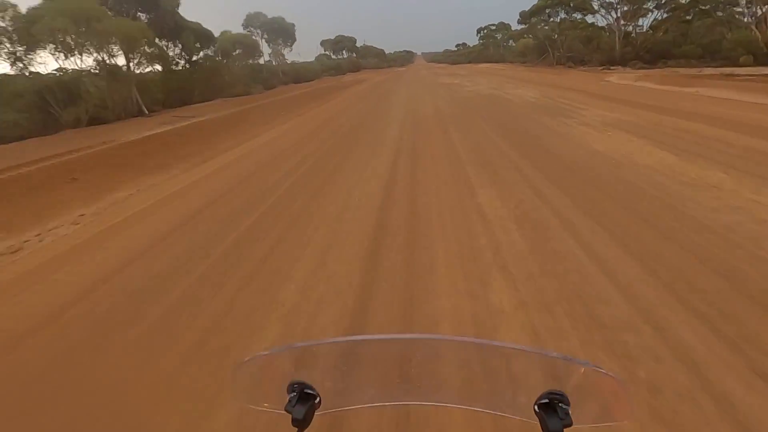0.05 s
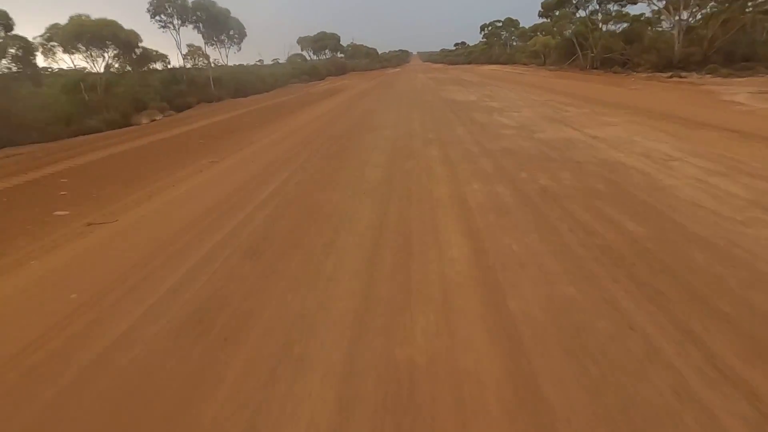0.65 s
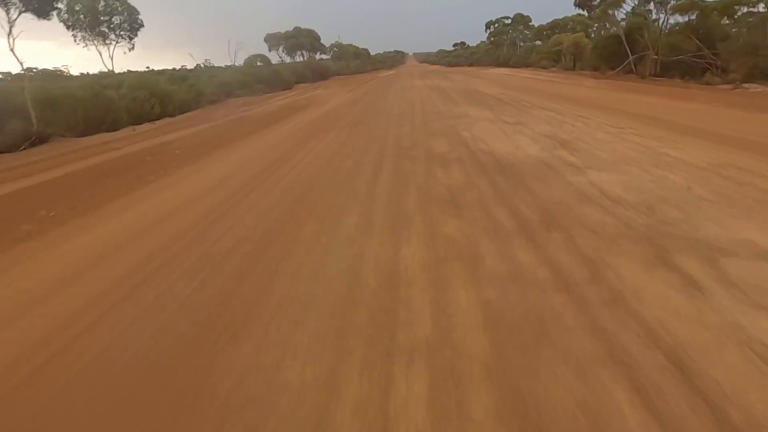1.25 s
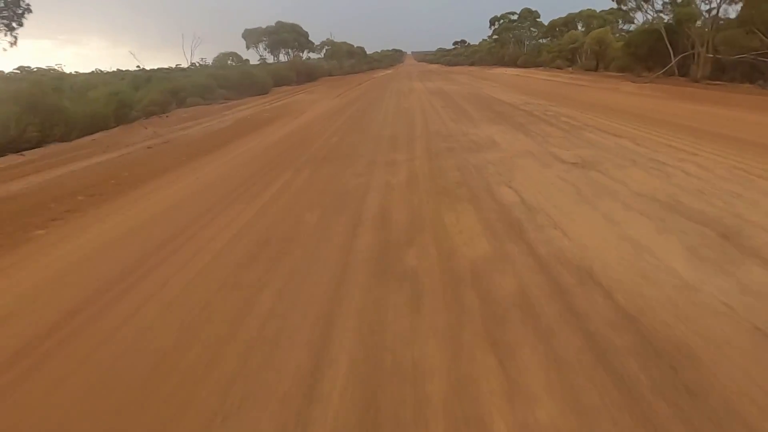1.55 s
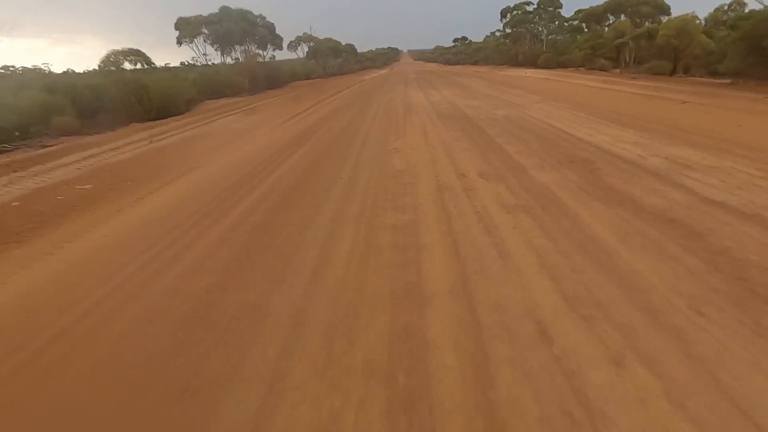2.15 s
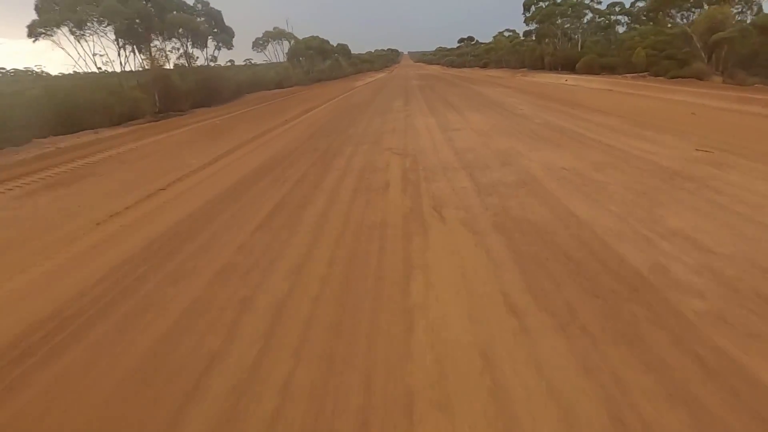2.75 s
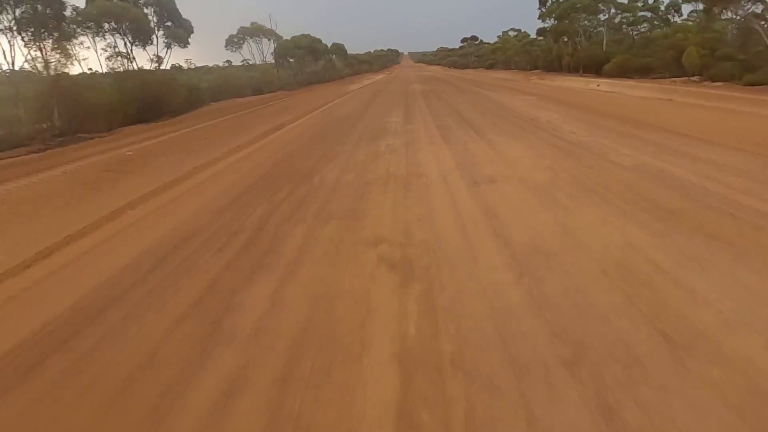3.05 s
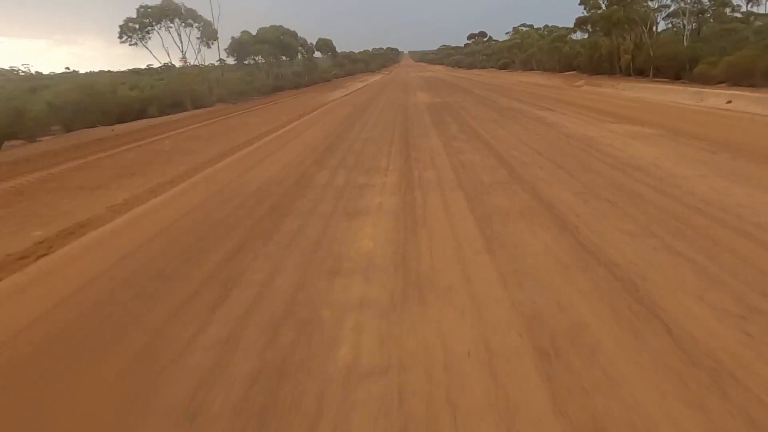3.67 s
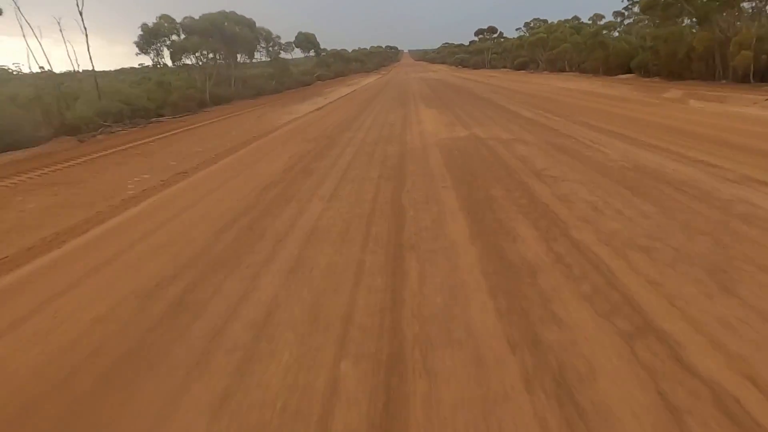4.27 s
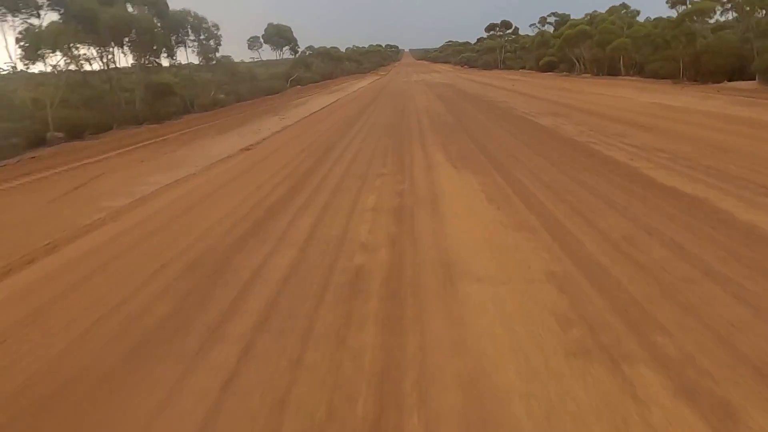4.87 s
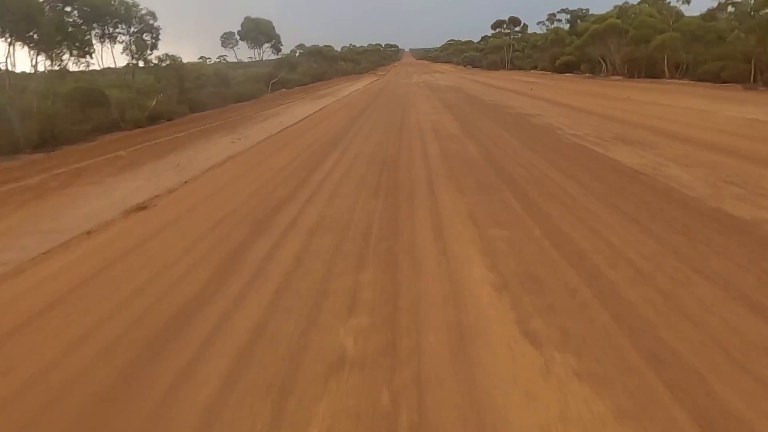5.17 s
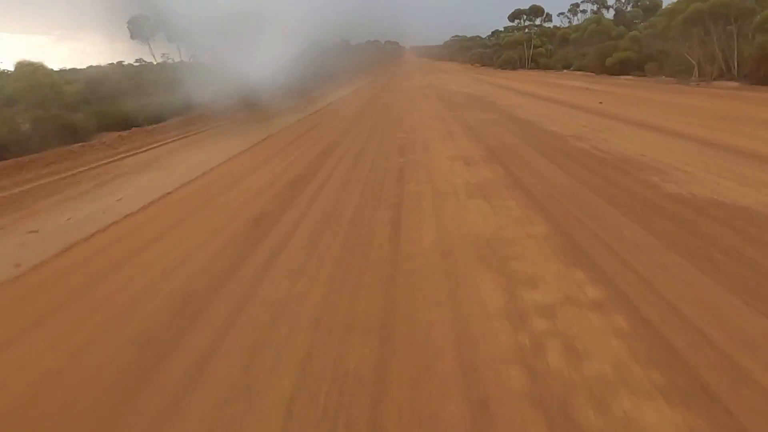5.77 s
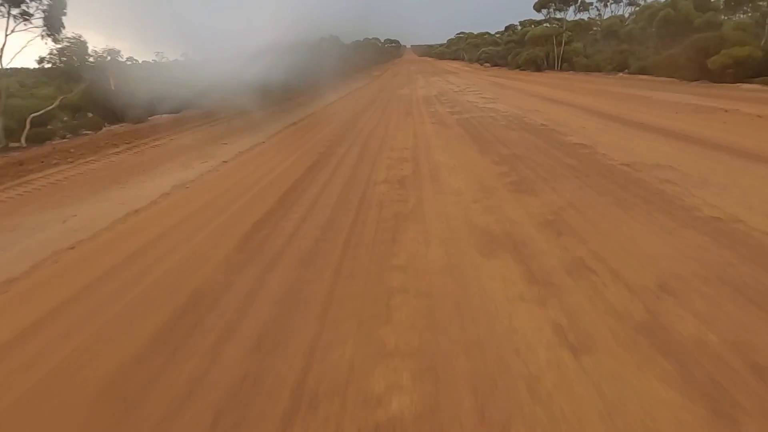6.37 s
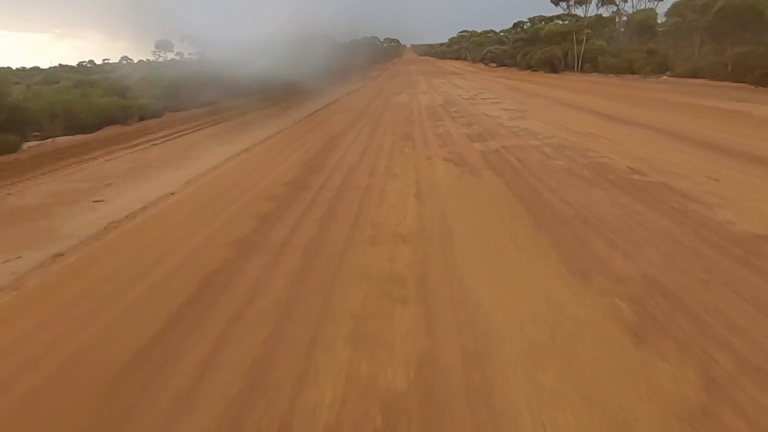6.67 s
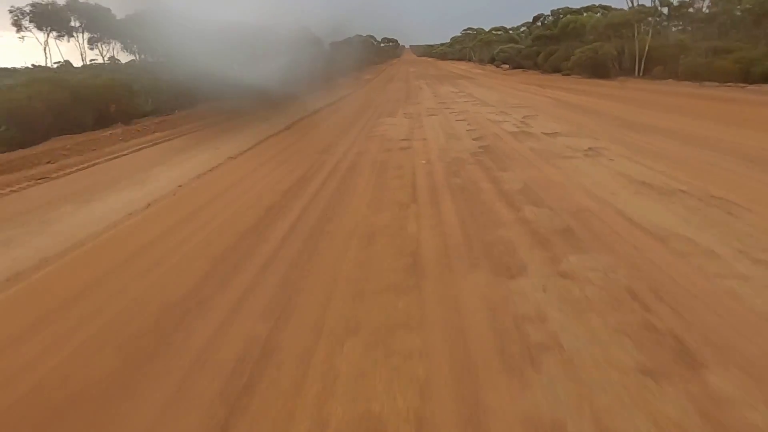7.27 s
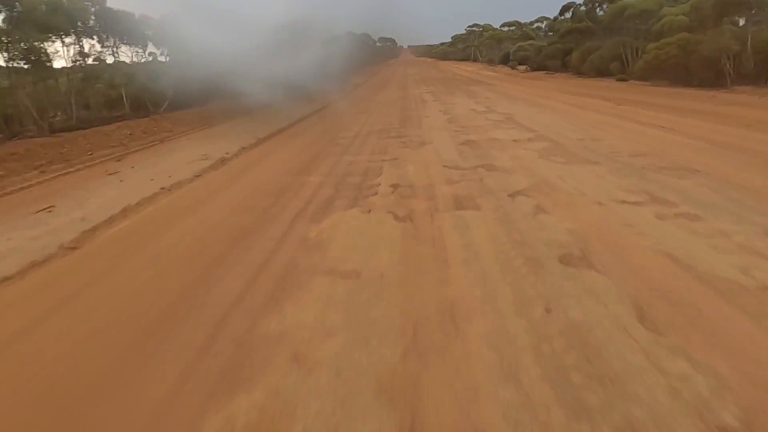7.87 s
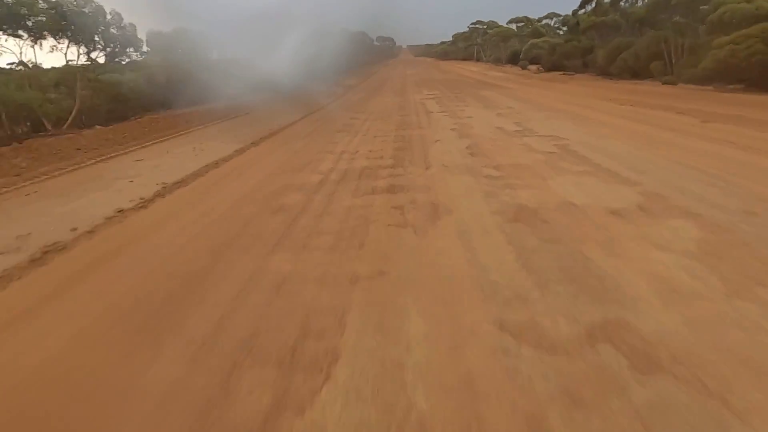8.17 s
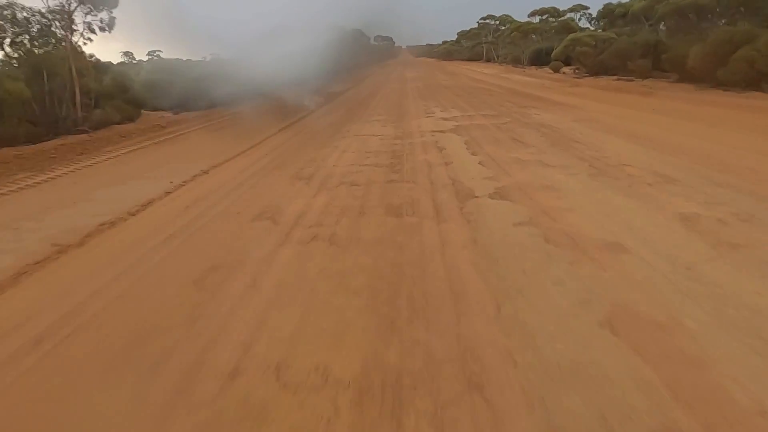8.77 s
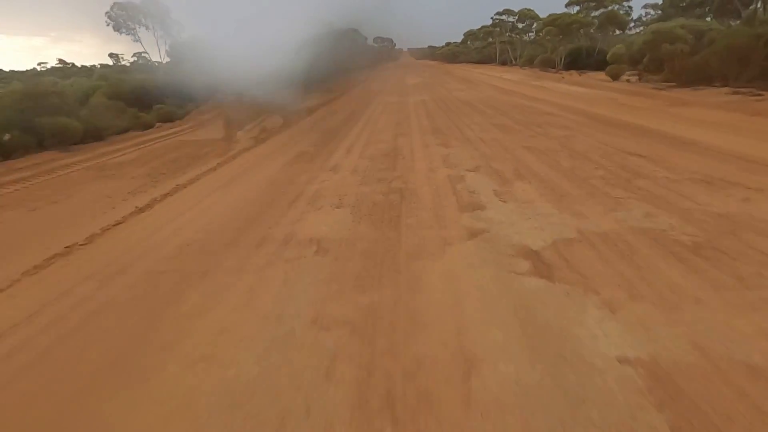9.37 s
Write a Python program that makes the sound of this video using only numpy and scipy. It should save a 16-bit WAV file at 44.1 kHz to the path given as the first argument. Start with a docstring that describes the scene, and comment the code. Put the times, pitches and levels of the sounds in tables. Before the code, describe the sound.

A single-cylinder motorcycle cruises along a gravel road, heard from a microphone on the rider, in the left channel only. The exhaust thumps in a fast, even drone with light metallic clatter, while gusts of wind rumble and rush over the microphone. Tyres hiss faintly and flung stones tick against the bike, two of them sharper than the rest. The engine eases slightly midway and picks up again near the end.

```python
"""A single-cylinder motorcycle cruises on gravel, heard from a microphone on the rider, left channel only.
From the start the exhaust thumps about 44 times a second, each thump led by an intake bark, over valve
clatter, tyre hiss and gusts of wind. By 0.7 s the microphone leaves the windscreen's shelter and the air
hisses more. Flung stones tick on the bike, hardest at 1.4 and 5.6 s. The engine eases a little through
the middle and picks up again from about 8 s."""
import sys
import numpy as np
from scipy import signal
from scipy.fft import rfft, irfft
from scipy.io import wavfile

SR = 44100
rng = np.random.default_rng(int(sys.argv[2]) if len(sys.argv) > 2 else 0)


def wrap_up_sound(samples):
    """Save the sound to the file named by the first command line argument, as 16-bit audio."""
    columns = np.atleast_2d(samples).T
    # keep every value between -1 and 1, then stretch to whole-number steps
    tamed = np.clip(columns, -1, 1)
    steps = np.round(tamed * 32767).astype(np.int16)
    wavfile.write(sys.argv[1], SR, steps)


N = 419832
TIME = np.arange(N) / SR


def gain_of(db):
    """Decibels to amplitude."""
    return 10 ** (np.asarray(db) / 20)


def unit_rms(x):
    """Scales to an rms of 1."""
    return x / np.sqrt(np.mean(x ** 2) + 1e-20)


def curves(rows):
    """Turns rows of (time, values...) into one automation curve per value column."""
    times, *columns = np.transpose(rows)
    return [np.interp(TIME, times, column) for column in columns]


def wander(hz):
    """Random drift of rms 1 that rolls off above hz."""
    f = np.fft.rfftfreq(N, 1 / SR)
    return unit_rms(irfft(rfft(rng.standard_normal(N)) / (1 + (f / hz) ** 4), N))


def colour(x, points):
    """Shapes x with an EQ curve drawn on a log-frequency axis; rms 1."""
    hz, db = np.transpose(points)
    f = np.fft.rfftfreq(N, 1 / SR)
    eq_db = np.interp(np.log(f + 1), np.log(hz), db)
    return unit_rms(irfft(rfft(x) * gain_of(eq_db), N))


def ring(x, modes, size=16384):
    """Passes x through a body with steep resonances that ring only after they are struck; rms 1."""
    f = abs(np.fft.fftfreq(size, 1 / SR))
    power = sum((gain_of(db) / (1 + (2 * (f - hz) / width) ** 2)) ** 2 for hz, width, db in modes)
    log_gain = np.log(power + 1e-12) / 2
    minimum_phase = np.exp(np.conj(signal.hilbert(log_gain)))
    response = np.fft.ifft(minimum_phase).real[:size // 2]
    return unit_rms(signal.oaconvolve(x, response)[:N])


def strokes(cycle, at, uneven_db):
    """One impulse each engine cycle, at the fraction `at` of the cycle; no two equally strong."""
    hits = np.diff(np.floor(cycle - at), prepend=np.floor(cycle[0] - at))
    return unit_rms(hits * gain_of(uneven_db * rng.standard_normal(N)))


def puffs(cycle, at, length):
    """A burst of turbulence each engine cycle, decaying over the fraction `length` of the cycle."""
    return unit_rms(np.exp(-((cycle - at) % 1) / length) * rng.standard_normal(N))


def gravel(grains_per_s=1300, grit_per_s=26):
    """Countless grains crunch under the tyres over a smooth hiss; grit pings off the mudguard."""
    # tyre hiss on the road (time [s], level [dB])
    road_levels = [(0, -54.5), (.4, -52), (.75, -48.5), (1.4, -47), (3.0, -49), (4.0, -49.5), (4.2, -47),
                   (5.15, -47.5), (5.4, -46), (5.9, -48), (8.1, -47), (8.65, -48.5), (9.52, -46)]
    # tone of the crunch (frequency [Hz], level [dB])
    crunch_eq = [(500, -4.5), (1500, -3.5), (3000, 0), (4000, 0), (5200, -7.5), (6800, -5), (7600, -8),
                 (8500, -14), (9600, -16.5), (11000, -28), (12300, -35), (15000, -41)]
    # ring of grit on the mudguard (frequency [Hz], width [Hz], level [dB])
    grit_modes = [(7000, 1500, -1), (8900, 1300, 0), (10300, 1600, -9)]
    level_db, = curves(road_levels)
    grain_strength = gain_of(4.3 * np.minimum(rng.exponential(1, N), 5))
    grains = grain_strength * rng.choice([-1, 1], N) * (rng.random(N) < grains_per_s / SR)
    crunch = colour(rng.standard_normal(N) + gain_of(-6) * unit_rms(grains), crunch_eq)
    speck_strength = gain_of(3 * np.minimum(rng.exponential(1, N), 3))
    specks = speck_strength * (rng.random(N) < grit_per_s / SR)
    grit = gain_of(level_db - 26) * ring(specks, grit_modes)
    patchy_db = 0.5 * wander(hz=4.6) + wander(hz=45)
    return gain_of(level_db + patchy_db) * crunch + grit


def stones(overtone=1.35, top_hz=10300, attack_s=.0004, t60_s=.01, size=4096):
    """Each flung stone makes a dry tick: a broad crack and two short tones, duller for bigger stones."""
    # stones hitting the bike (time [s], peak [dB], pitch [Hz], share of ring against crack [0-1])
    hits = [(.128, -32, 2200, .3), (.2322, -33, 3600, .3), (.2325, -39, 7500, .1), (.3997, -39, 7400, .3),
            (.5262, -42, 5000, .3), (.6056, -38, 6700, .2), (.6217, -35, 8400, .4),
            (.7098, -26.5, 1800, .5), (.7278, -32, 5100, .6), (.7896, -31, 6900, .4), (.862, -37, 8900, .4),
            (1.1727, -42, 9100, .7), (1.2638, -38, 5500, .5), (1.2948, -39, 7750, .5),
            (1.327, -35, 6700, .4), (1.4195, -20, 1550, .65), (1.651, -42.5, 9500, .6),
            (1.8761, -43, 9100, .5), (2.0202, -34, 6400, .3), (2.0225, -31, 3000, .2),
            (2.025, -35, 7500, .1), (2.177, -38, 8950, .5), (2.4985, -37, 8600, .8),
            (2.9666, -40, 7600, .3), (3.2065, -38, 6700, .4), (3.823, -43, 8200, .4),
            (4.202, -43, 8000, .2), (4.4568, -39, 7100, .4), (4.708, -37, 6900, .5),
            (5.0645, -31, 6720, .75), (5.1363, -41, 7600, .3), (5.1517, -39, 7750, .3),
            (5.6385, -21, 1600, .45), (5.726, -42, 8500, .3), (6.02, -43, 9000, .5), (6.924, -33, 6700, .3),
            (7.2715, -37, 6200, .5), (7.428, -38, 6200, .6), (8.08, -40, 7900, .4), (8.357, -36, 7200, .3),
            (8.391, -39, 7900, .4)]
    out = np.zeros(N + size)
    t, f = np.arange(size) / SR, np.fft.rfftfreq(size, 1 / SR)
    envelope = gain_of(-60 * t / t60_s) * (1 - np.exp(-t / attack_s))
    for time, peak_db, hz, ringing in hits:
        band = np.exp(-(np.log2((f + 1) / hz) / .65) ** 2)
        low_shelf = gain_of(-16) / (1 + (f / (2 * hz)) ** 4)
        crack_eq = (band + low_shelf) / (1 + (f / top_hz) ** 7)
        crack = unit_rms(irfft(rfft(rng.standard_normal(size)) * crack_eq))
        tones = sum(np.sin(2 * np.pi * m * t) / (1 + (m / top_hz) ** 30) for m in (hz, overtone * hz))
        tick = (ringing * unit_rms(tones) + (1 - ringing) * crack) * envelope
        start = round(time * SR)
        out[start:start + size] += gain_of(peak_db) * tick / abs(tick).max()
    return out[:N]


def airflow(eddy_db=2, flutter_db=0.69):
    """Buffet, drum and rush levels in dB: steady flow, smooth gusts and lulls, and small random eddies."""
    # the steady wind bed (time [s], buffet [dB], drum [dB], rush [dB])
    steady_flow = [(0, -20.5, -27, -26.5), (1.1, -21.5, -32.5, -26.5), (2.4, -21, -33.5, -28.5),
                   (3.3, -22, -27, -25.5), (4.1, -22, -33.5, -28.5), (5.4, -21.5, -32.5, -27.5),
                   (7.4, -20.5, -32, -25.5), (8.6, -23.5, -42, -25), (9.52, -20.5, -26, -24)]
    # gusts, or lulls where negative
    # (centre [s], length [s], added buffet [dB], added drum [dB], added rush [dB])
    gusts = [(.26, 0.37, 2.5, 4, 0.5), (0.745, 0.11, 3.5, 5, 1.5), (0.885, 0.13, -3, 4, -2.5),
             (1.167, 0.33, 3.5, 8, -2), (1.472, 0.18, 4, 3.5, 2.5), (1.734, 0.053, 1, -3, -6),
             (1.875, 0.28, -2.5, 9, 2), (2.184, 0.19, 1, 6.5, 4.5), (2.385, 0.17, 3, 2, 5.5),
             (2.653, 0.064, 0.5, 10.5, 2), (2.86, 0.1, 0, 4.5, 4.5), (2.98, 0.15, 2, 7.5, 4.5),
             (3.19, 0.086, 3, 3.5, 3), (3.292, 0.13, 6.5, 2, -0.5), (3.582, 0.1, 2, 5, 3.5),
             (3.683, 0.21, 1, -17, -1.5), (4.193, 0.13, 6, 9, 2.5), (4.722, 0.14, 5, 2, 2),
             (4.841, 0.056, 7, 7, 5.5), (5.393, 0.28, 4, 1, 1.5), (5.64, 0.11, 7, -3, 3),
             (5.811, 0.12, 2, 6, 5.5), (6.13, 0.19, -7, -9, 2), (6.44, 0.2, 3, 1, 3),
             (6.667, 0.16, 0, -7, 0), (6.997, 0.17, 4.5, 5, -0.5), (7.223, 0.11, -2, 9, 0),
             (7.67, 0.13, 1.5, 2, 2), (7.81, 0.15, 4, -5, 1), (8.172, 0.17, 2, 7, 3.1),
             (8.335, 0.12, 6, 9, 1.5), (8.53, 0.36, -1, -4, -1.5), (8.913, .1, 0, -2, 0.5),
             (9.088, 0.12, -7, 11.5, 3)]
    levels = np.array(curves(steady_flow))
    for centre, length, *added_db in gusts:
        swell = np.cos(np.pi / 2 * np.clip(2 * (TIME - centre) / length, -1, 1))
        levels += np.outer(added_db, swell)
    buffet_db, drum_db, rush_db = levels
    flutter = flutter_db * wander(hz=17)
    return buffet_db + eddy_db * wander(hz=8.9), drum_db + flutter, rush_db + flutter


def wind(cycle):
    """Large eddies shake the microphone, smaller ones drum on it; rush and hiss throb with each firing."""
    # the hiss swells as the microphone leaves the windscreen's shelter (time [s], level [dB])
    exposure = [(0, -12), (.35, -9), (.55, -5), (.7, 0), (9.5, 0)]
    # tone of each wind layer (frequency [Hz], level [dB])
    buffet_eq = [(1, -29), (5, -3), (22, -1.5), (32, -5), (60, -10.5), (100, -20), (160, -25), (300, -37),
                 (800, -64), (2000, -100)]
    drum_eq = [(25, -28), (65, -2.5), (95, 0.5), (140, -4), (200, -12.5), (400, -34), (1500, -80)]
    rush_eq = [(30, -23), (110, -3), (170, -1), (260, -1), (400, -1), (560, -6), (800, -11.5),
               (1200, -28.5), (3000, -51), (12000, -87)]
    hiss_eq = [(300, -1.5), (600, -0.5), (800, -3), (1200, -8), (1800, -19), (3000, -23), (6000, -53),
               (12000, -75)]
    thump_eq = [(20, -37), (70, -13), (140, -1.5), (260, -0.5), (450, -11.5), (900, -35), (4000, -86)]
    buffet_db, drum_db, rush_db = airflow()
    exposure_db, = curves(exposure)
    gust_db = rush_db + 0.22 * exposure_db
    throb_db = .9 * np.cos(2 * np.pi * cycle)
    buffet = gain_of(buffet_db) * colour(rng.standard_normal(N), buffet_eq)
    drum = gain_of(drum_db) * colour(rng.standard_normal(N), drum_eq)
    rush = gain_of(gust_db + throb_db - 1.5) * colour(rng.standard_normal(N), rush_eq)
    hiss = gain_of(gust_db + throb_db + exposure_db - 7.5) * colour(rng.standard_normal(N), hiss_eq)
    # strong gusts break up on the housing: their dull thump grows with the square of the rush
    thump = gain_of(2 * gust_db + 17.5) * colour(rng.standard_normal(N), thump_eq)
    return buffet + drum + rush + hiss + thump


def clatter(cycle):
    """Two valves seat in each cycle and, with the whirr of the chain, ring the engine casing."""
    # clatter of the casing (time [s], level [dB])
    casing_levels = [(0, -49), (.2, -47), (.52, -45.5), (.69, -43.5), (.9, -46.5), (2.5, -50.5),
                     (4.0, -49.5), (5.5, -45.5), (6.0, -48.5), (7.9, -46.5), (8.6, -48.5), (9.52, -42.5)]
    # metallic ring of the casing (frequency [Hz], width [Hz], level [dB])
    casing_modes = [(1600, 720, -5.5), (2048, 160, -2), (2264, 215, 1), (2550, 410, -5.5)]
    level_db, = curves(casing_levels)
    valves = strokes(cycle, at=.4, uneven_db=3) + strokes(cycle, at=.96, uneven_db=3)
    whirr = gain_of(8) * rng.standard_normal(N)
    return gain_of(level_db + 0.59 * wander(hz=24)) * ring(valves + whirr, casing_modes)


def engine_cycles(slip=.0016):
    """Running count of firings; the rear tyre slips a little on the loose surface, so the speed wavers."""
    # engine speed (time [s], firing rate [Hz])
    speed = [(0.0, 45.15), (0.6, 44.94), (1.0, 44.59), (1.5, 44.78), (2.5, 44.24), (2.9, 43.74),
             (3.3, 44.01), (4.2, 43.75), (4.7, 44.32), (5.1, 43.46), (5.8, 44.26), (6.4, 44.03),
             (7.5, 44.14), (8.4, 45.05), (9.52, 44.73)]
    firing_hz, = curves(speed)
    return np.cumsum(firing_hz * (1 + slip * wander(hz=6))) / SR


def engine(cycle, gear_teeth=34):
    """Each cycle the airbox drones, the intake barks, then the exhaust thumps; a gear whines faintly."""
    # balance of the engine's voices (time [s], exhaust [dB], airbox drone [dB], intake bark [dB])
    voice_levels = [(0, -26.3, -40, -36), (.5, -26, -32, -36.8), (1.0, -28, -31.5, -41),
                    (2.4, -30.3, -34.5, -44.5), (3.0, -29, -33.5, -43.5), (3.8, -30.5, -35, -44.5),
                    (4.5, -29.7, -30.2, -42.7), (5.0, -29, -30.7, -42.2), (5.4, -28.3, -28, -41.7),
                    (6.0, -29.5, -31.5, -42), (7.0, -29, -32.5, -42), (8.0, -27.7, -29.8, -39.5),
                    (8.6, -27.7, -33.5, -41), (9.52, -25.5, -31, -40)]
    # resonances of the three air passages (frequency [Hz], width [Hz], level [dB])
    airbox_modes = [(442, 45, -3.5), (550, 78, 0), (620, 35, -13)]
    intake_modes = [(715, 50, -8), (752, 60, 0), (797, 55, -2), (880, 140, -8), (980, 110, -5),
                    (1190, 150, -8), (1540, 70, -14), (1700, 70, -17)]
    exhaust_modes = [(62, 70, -2), (225, 45, -6.5), (287, 105, 0), (385, 120, -19), (447, 30, -5.5)]
    exhaust_db, airbox_db, bark_db = curves(voice_levels)
    suck = strokes(cycle, at=-.38, uneven_db=1.2) + gain_of(-11) * puffs(cycle, at=-.38, length=.15)
    gulp = strokes(cycle, at=-.15, uneven_db=1.4) + gain_of(-11) * puffs(cycle, at=-.15, length=.3)
    blow = strokes(cycle, at=0, uneven_db=1.0) + gain_of(-15) * puffs(cycle, at=0, length=.08)
    airbox = gain_of(airbox_db + 1.3 * wander(hz=6)) * ring(suck, airbox_modes)
    bark = gain_of(bark_db) * ring(gulp, intake_modes)
    exhaust = gain_of(exhaust_db) * ring(blow, exhaust_modes)
    whine = gain_of(-61 + 2.4 * wander(hz=3.7)) * np.sin(2 * np.pi * gear_teeth * cycle)
    return airbox + bark + exhaust + whine


def scene():
    """Bike, wind and road reach one microphone on the left channel; the right is silent."""
    cycle = engine_cycles()
    mix = engine(cycle) + clatter(cycle) + wind(cycle) + gravel() + stones()
    return np.array([mix, np.zeros(N)])


def record(dry):
    """Microphone gain, a soft ceiling on the largest gusts, and a steep high cut."""
    gain_db, ceiling, high_cut_hz = 6, .95, 15250
    loud = gain_of(gain_db) * dry
    limited = loud / (1 + (loud / ceiling) ** 8) ** (1 / 8)
    lowpass = signal.firwin(511, high_cut_hz, window=("kaiser", 9), fs=SR)
    return signal.oaconvolve(limited, lowpass[None], "same")


dry = scene()
out = record(dry)
wrap_up_sound(out)
```